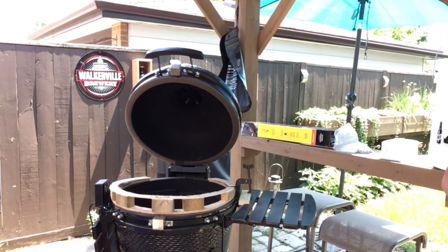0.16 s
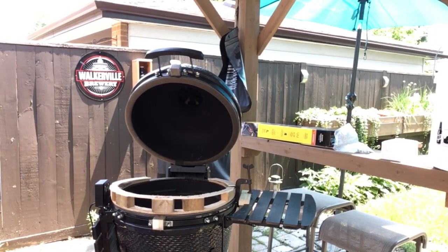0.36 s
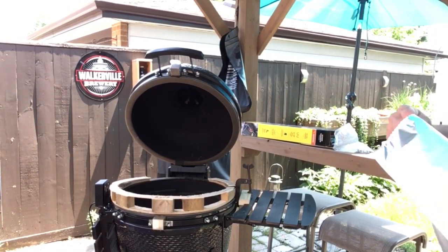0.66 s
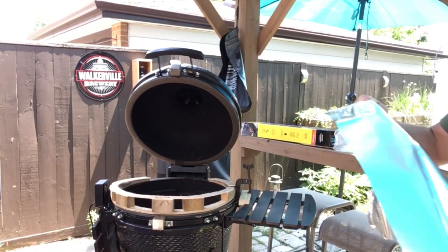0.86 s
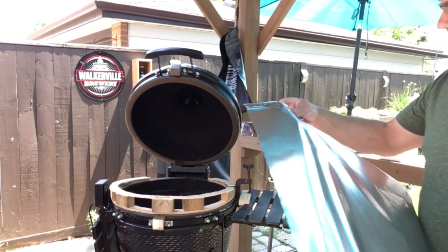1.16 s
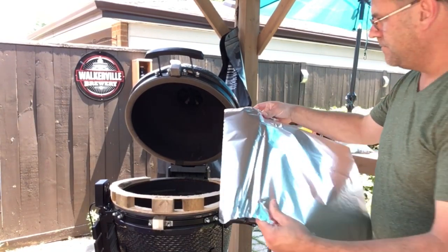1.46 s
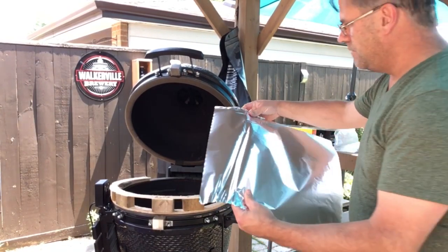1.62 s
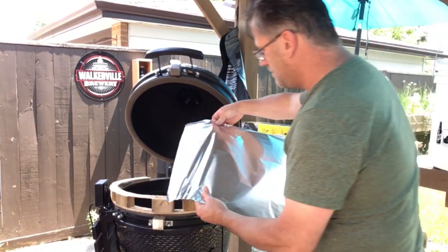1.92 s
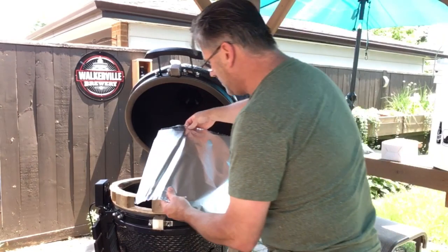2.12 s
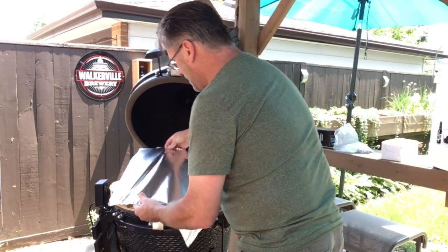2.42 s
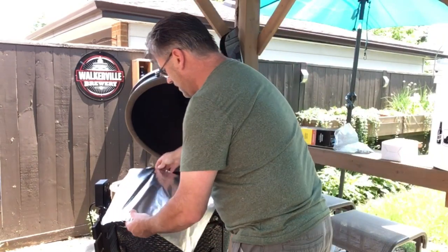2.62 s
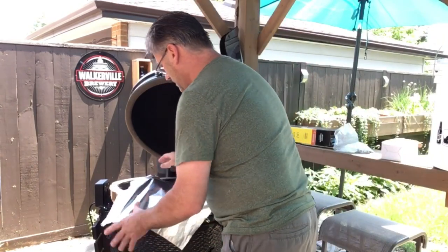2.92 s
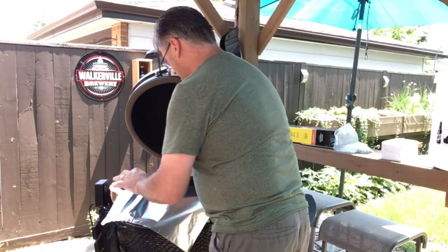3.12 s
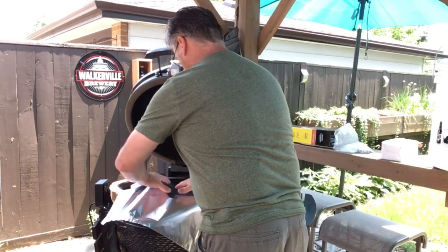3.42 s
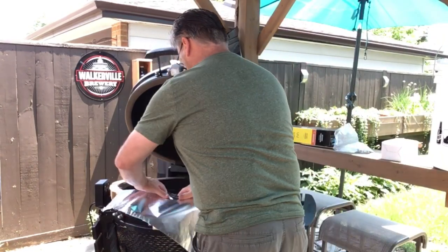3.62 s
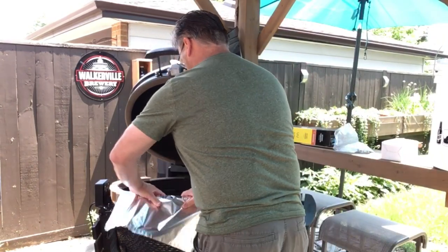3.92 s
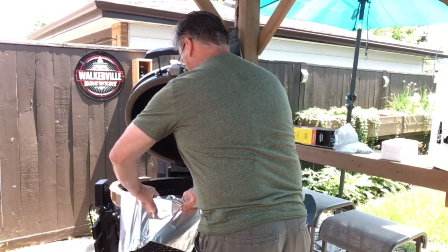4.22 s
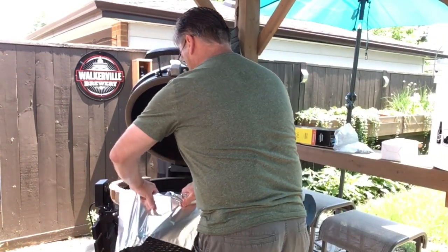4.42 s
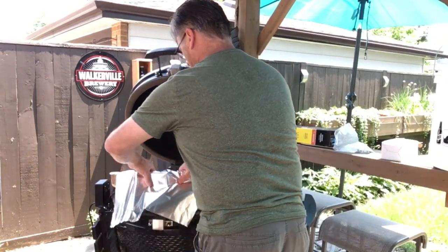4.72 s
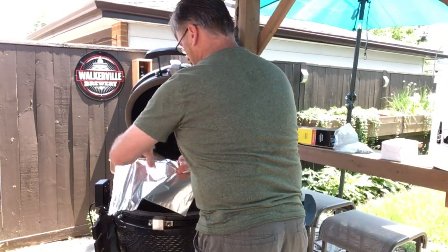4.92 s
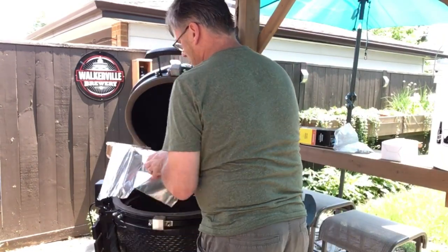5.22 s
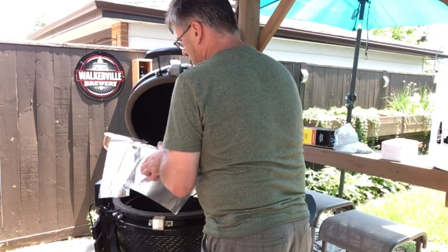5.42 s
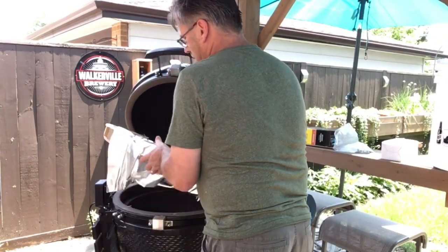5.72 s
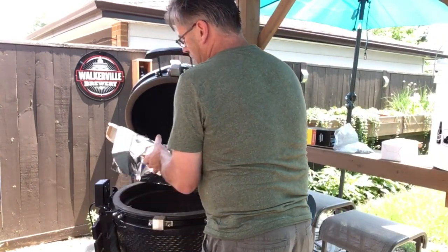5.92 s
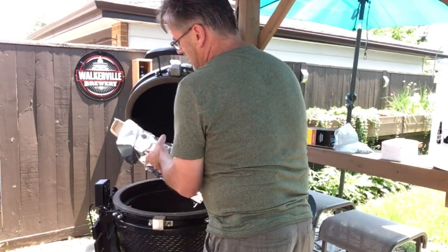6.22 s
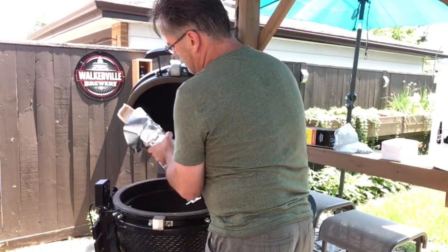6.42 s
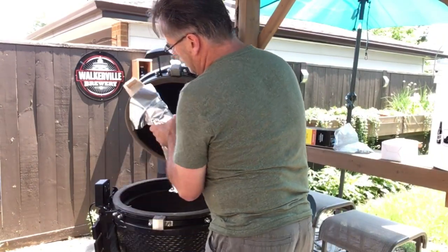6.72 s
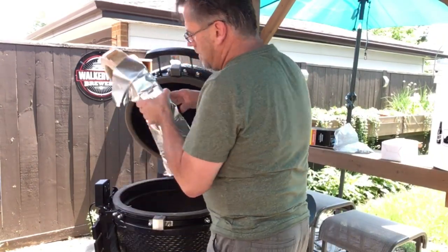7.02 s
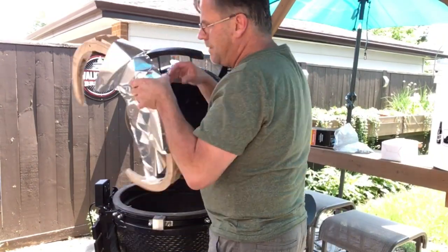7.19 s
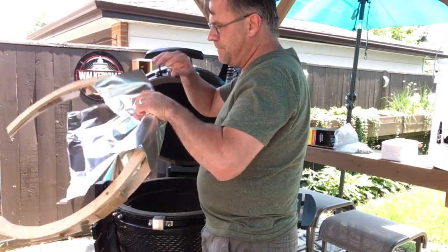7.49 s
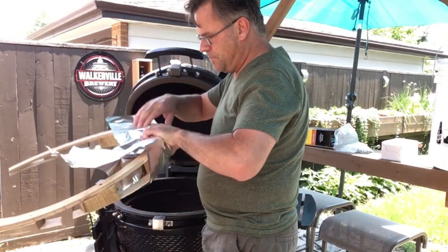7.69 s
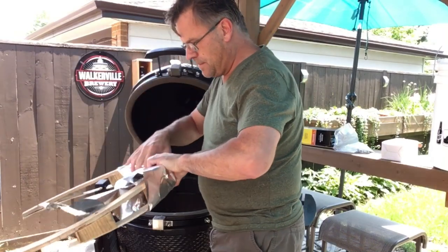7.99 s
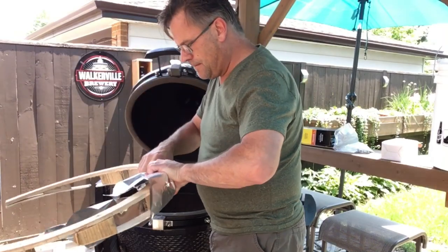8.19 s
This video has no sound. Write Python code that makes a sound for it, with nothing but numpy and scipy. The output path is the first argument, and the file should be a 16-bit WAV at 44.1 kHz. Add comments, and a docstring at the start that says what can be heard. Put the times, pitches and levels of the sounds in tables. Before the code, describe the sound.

A sheet of aluminium foil is torn off with a loud, bright rip while the roll knocks hollowly inside its cardboard box. The loose sheet then rustles and crinkles in uneven waves as it is carried and folded around a piece of wood, with sharp snaps, small pops and hollow finger crunches. The crinkling grows lighter later on. It is heard from nearby in a yard, over a faint low rumble.

```python
"""In a fenced back yard, a sheet of aluminium foil is torn off against the edge of its cardboard box,
carried to a grill and folded round a curved piece of wood. The box booms as the roll knocks inside it.
Countless tiny creases buckle and set the thin sheet ringing; now and then a whole fold snaps, a panel
pops or a pocket crunches under a finger. A low outdoor rumble lies underneath."""
import sys
import numpy as np
from scipy import signal
from scipy.fft import rfft, irfft, next_fast_len
from scipy.io import wavfile

SR = 44100
rng = np.random.default_rng(int(sys.argv[2]) if len(sys.argv) > 2 else 0)


def store_pcm(level_fs):
    """Save levels as 16-bit WAV."""
    pcm = np.round(np.clip(level_fs, -1, 1) * 32767).astype(np.int16)
    wavfile.write(sys.argv[1], SR, np.atleast_2d(pcm).T)


N = 368214


def from_db(db):
    """Turn decibels into a factor to multiply by."""
    return 10 ** (np.asarray(db) / 20)


def rms_one(x):
    """Scale a sound so that its average strength (rms) is 1."""
    return x / np.sqrt(np.mean(x ** 2) + 1e-20)


def coloured(x, spectrum):
    """Shape the tone of x with a smooth curve of (f/Hz, level/dB) points; rms 1."""
    hz, db = np.transpose(spectrum)
    size = next_fast_len(N + 8192)
    bin_hz = np.maximum(np.arange(size // 2 + 1) * SR / size, 1)
    gain = from_db(np.interp(np.log(bin_hz), np.log(hz), db))
    return rms_one(irfft(rfft(x, size) * gain, size)[:N])


def below(x, hz):
    """The part of x lower than hz."""
    return signal.sosfiltfilt(signal.butter(2, hz, fs=SR, output="sos"), x)


def treble(x, hz, db):
    """Turn the part of x above hz up or down by db."""
    under = below(x, hz)
    return under + from_db(db) * (x - under)


def drift(per_s):
    """A curve that wanders to a new random value per_s times a second; rms 1."""
    steps = np.arange(N) / SR * per_s
    return rms_one(np.interp(steps, np.arange(4000), rng.standard_normal(4000)))


def resonance(x, hz, width_hz):
    """Let x ring at one pitch; the narrower the width, the longer it rings."""
    r = np.exp(-np.pi * width_hz / SR)
    feedback = [1, -2 * r * np.cos(2 * np.pi * hz / SR), r * r]
    return signal.lfilter(np.array([1, 0, -1]) * (1 - r * r) / 2, feedback, x)


def ringing(push, tones):
    """A body rings at its own tones; each click lands elsewhere, so it pushes or pulls each at random."""
    return sum(from_db(db) * resonance(push * rng.choice([-1, 1], N), hz, width)
               for hz, width, db in tones)


def bursts(events, t60):
    """Loudness that jumps up at each (t/s, level/dB); t60 is always the seconds taken to fade by 60 dB."""
    out = np.zeros(N)
    for start, db in events:
        at = int(start * SR)
        age = np.arange(min(SR // 2, N - at)) / SR
        out[at:at + len(age)] += from_db(db - 60 * age / t60)
    return out


def stroke(start, length, attack_s, t60):
    """Loudness of one hand move: it rises, holds to the end of its length and dies away."""
    out = np.zeros(N)
    at = np.arange(int(start * SR), min(int(start * SR) + SR, N))
    age = at / SR - start
    out[at] = np.clip(age / attack_s, 0, 1) * from_db(-60 * np.maximum(age - length, 0) / t60)
    return out


def creases(per_s, spread_db, clump_db):
    """Foil buckles in clicks of uneven size that come in little clumps; rms 1."""
    chance = np.clip(per_s / SR, 1e-4, 1)
    sizes = from_db(spread_db * np.minimum(rng.exponential(1, N), 3)) * rng.choice([-1, 1], N)
    clicks = (rng.random(N) < chance) * sizes / np.sqrt(chance)
    return rms_one(clicks * from_db(clump_db * drift(140)))


def sheet(clicks, t60, ring_db):
    """After each click the crumpled sheet rings at so many pitches that it sounds like fading noise."""
    decay = from_db(-120 / (t60 * SR))
    energy = signal.lfilter([1 - decay], [1, -decay], clicks ** 2 + 1e-18)
    return rms_one(clicks + from_db(ring_db) * np.sqrt(energy) * rng.standard_normal(N))


# Tone of the outdoor rumble: f/Hz, relative level/dB
RUMBLE_COLOUR = [(22, -44), (40, -12), (62, 3.5), (88, -2), (118, 3.5), (180, -6), (235, -7.5), (320, -12),
                 (480, -19), (900, -21.5), (3500, -30), (9000, -52), (16000, -55.5)]
# Pitches of a faint, far-off hum: f/Hz, width/Hz, level/dB
HUM_TONES = [(77, 6, -52.5), (118, 9.7, -54), (230.7, 8.4, -57), (287.8, 14, -66)]

def background(rumble_db=-45.5, waver_db=0.2):
    """A distant rumble with a faint hiss and an unsteady hum."""
    rumble = from_db(rumble_db + waver_db * drift(11)) * coloured(rng.standard_normal(N), RUMBLE_COLOUR)
    noise = rng.standard_normal(N)
    hum = sum(from_db(db) * rms_one(resonance(resonance(noise, hz, width), hz, width))
              for hz, width, db in HUM_TONES)
    return rumble + hum


# Echoes from deck, fence and house: delay/s, level/dB compared with the direct sound
YARD_ECHOES = [(.0043, -37), (0.01, -24), (0.022, -23)]

def yard_echoes(x, tail_db=-21.5, t60=0.23, dull_hz=5000):
    """Hard surfaces throw the sound back; boards and leaves scatter it into a short, duller tail."""
    t = np.arange(SR // 2) / SR
    scatter = below(rng.standard_normal(len(t)), dull_hz) * from_db(-60 * t / t60) * (t > 0.008)
    response = from_db(tail_db) * scatter / np.linalg.norm(scatter)
    response[0] = 1   # the direct sound
    for delay, db in YARD_ECHOES:
        response[int(delay * SR)] += from_db(db)
    return signal.oaconvolve(x, response / np.linalg.norm(response))[:N]


# Tones of the cardboard box: f/Hz, width/Hz, relative level/dB
BOX_TONES = [(134, 34.5, -0.5), (226, 50, 0.5), (284, 20, 1.5), (412, 41, -3), (500, 300, -6.5),
             (732, 81, -6), (795, 350, -9)]
# Knocks of the roll: t/s, relative level/dB
ROLL_KNOCKS = [(0.169, -15), (0.203, -14.5), (0.376, -11), (0.45, -9), (0.477, -1.5)]

def knocking_roll(gain_db=35.0):
    """The roll jerks and knocks against the inside of its hollow box."""
    knocks = np.zeros(N) + 1e-18
    for start, db in ROLL_KNOCKS:
        knocks[int(start * SR)] = from_db(db + gain_db)
    return ringing(knocks, BOX_TONES)


# Tone of the rip: f/Hz, relative level/dB
TEAR_COLOUR = [(500, -17), (1000, -5), (1400, 3), (3000, 5), (5500, 4.5), (9000, 5.5), (12500, 6),
               (14500, 4.5), (16000, -6)]
# Tugs on the sheet: t/s, length/s, rise/s, rip level/dB, weakening/(dB per s), relative box level/dB
TEAR_TUGS = [(0.164, 0.028, 0.012, -15.5, 0, -30), (0.208, 0.098, 0.016, -5.5, 80, -17.5),
             (0.301, 0.17, 0.067, -7.5, 10.5, -14.5)]

def tearing(box_db=-1.5, box_follows=1.67, box_lag_s=0.0077):
    """With each tug the foil gives way tooth by tooth along the cutter, which shakes the box."""
    t = np.arange(N) / SR
    rip = shake = 0
    for start, length, attack_s, db, sag, shake_db in TEAR_TUGS:
        weakening = from_db(-sag * np.clip(t - start - attack_s, 0, length))
        pull = stroke(start, length, attack_s, t60=0.16) * weakening
        rip = np.hypot(rip, from_db(db) * pull)
        late_pull = np.interp(t - box_lag_s, t, pull)
        shake = np.hypot(shake, from_db(shake_db) * late_pull ** box_follows)
    teeth = creases(per_s=5000, spread_db=1.5, clump_db=-1.1)
    foil = coloured(sheet(teeth, t60=0.1, ring_db=0.5), TEAR_COLOUR)
    boom = ringing(teeth, BOX_TONES)
    return rip * foil + from_db(box_db) * shake * rms_one(boom - below(boom, hz=100))


# Tones of a hollow pocket of foil: f/Hz, width/Hz, relative level/dB
POCKET_TONES = [(176, 45, 2), (365, 72, -1.5), (624, 70, 5), (736, 83, 2), (1300, 270, -8),
                (1750, 370, -13)]
# Finger presses: t/s, relative level/dB
FINGER_PRESSES = [(3.949, -33), (4.009, -32), (4.185, -20), (5.324, -25), (5.444, -24.5), (5.55, -22),
                  (5.729, -27), (5.889, -38), (6.004, -37), (6.239, -27), (6.939, -27.5), (7.252, -29.5),
                  (8.151, -27)]

def pressing(gain_db=-12.0):
    """A finger flattens a pocket of foil against the wood with a short, hollow crunch."""
    push = bursts(FINGER_PRESSES, t60=0.15) * creases(per_s=5000, spread_db=-0.5, clump_db=2.5)
    return from_db(gain_db) * np.std(push) * rms_one(ringing(push, POCKET_TONES))


# Tones of a wide panel of foil: f/Hz, width/Hz, relative level/dB
PANEL_TONES = [(1250, 200, -1.5), (1790, 300, 1), (2720, 400, -1.5)]
# Pops of a panel: t/s, level/dB
PANEL_POPS = [(4.33, -39.5), (5.424, -38), (5.802, -37), (6.005, -28), (8.157, -31)]

def popping():
    """A bulging panel flips over to its other side and rattles."""
    rattle = ringing(creases(per_s=4000, spread_db=3.0, clump_db=2.0), PANEL_TONES)
    return bursts(PANEL_POPS, t60=0.17) * rms_one(rattle)


# Tone of a snap: f/Hz, relative level/dB
SNAP_TONE = [(150, -5), (700, -9), (1400, -1.5), (3000, 4.5), (6600, 4), (12500, 4), (16000, -1.5)]
# Sharp snaps and brief scrunches of foil: t/s, relative level/dB, extra sizzle/dB in the high treble
FOIL_SNAPS = [(0.036, -40, -1), (0.127, -43, 3), (0.964, -35, 1), (1.121, -20.5, 3), (1.363, -23, 3),
              (1.49, -40, -8), (2.037, -31, -8), (2.405, -35, -4), (2.574, -34, 0.5), (2.901, -39, -1),
              (3.487, -39, -8), (3.527, -28, 5), (3.619, -31.5, 0), (3.782, -26.5, 1), (4.183, -30, 4),
              (4.33, -30, -1), (4.505, -38, 4), (4.685, -31.5, -1.5), (4.925, -45, -1), (5.18, -46, -10.5),
              (5.29, -43, -8), (5.325, -29, 2), (5.422, -27, -1), (5.8, -27.5, -4), (6.002, -22.5, -9),
              (6.14, -37, 7), (6.524, -39, -5), (6.675, -45, 2), (6.773, -42, -4), (6.886, -41, -2),
              (7.237, -45, -1), (7.376, -39, -5), (7.534, -42, -7), (7.763, -35.5, -3), (7.916, -42, 7),
              (8.043, -34, 7), (8.155, -31.5, -2)]

def snapping(gain_db=-2.0, crack_db=-15.0):
    """A fold gives way or the foil is briefly scrunched: a crack, then a sizzling volley of creases."""
    clicks = creases(per_s=5800, spread_db=5.0, clump_db=-0.5)
    volley = coloured(sheet(clicks, t60=0.05, ring_db=4.0), SNAP_TONE)
    lower = below(volley, hz=7500)
    snaps = [(start, db) for start, db, _ in FOIL_SNAPS]
    sizzles = [(start, db + extra_db) for start, db, extra_db in FOIL_SNAPS]
    crack = from_db(crack_db) * bursts(snaps, t60=0.025) * volley
    body = bursts(snaps, t60=0.237) * rms_one(lower)
    sizzle = bursts(sizzles, t60=0.27) * rms_one(volley - lower)
    return from_db(gain_db) * (crack + body + sizzle)


def hush_before_snaps(hush_db=-1.0, hold_s=0.016):
    """The crinkling dips slightly just before each snap, so the snap sounds sharper."""
    dip_db = np.zeros(N)
    for start, _, _ in FOIL_SNAPS:
        at = int(start * SR)
        time_left = np.arange(min(at, SR // 4))[::-1] / SR
        dip_db[at - len(time_left):at] += hush_db * np.exp(-time_left / hold_s)
    return from_db(dip_db)


def pings(per_s, t60, count=10000):
    """Small flat spots of the sheet ring briefly, each at a pitch of its own; rms 1."""
    chance, pitch, phase = rng.random((3, count))
    starts = np.cumsum(-np.log(1 - chance)) / per_s * SR   # random gaps between pings
    heard = starts < N
    age = np.arange(SR // 25)
    hz = 300 + 15000 * pitch[heard, None]
    rings = np.sin(2 * np.pi * (hz * age / SR + phase[heard, None])) * from_db(-60 * age / SR / t60)
    at = starts[heard, None].astype(int) + age
    return rms_one(np.bincount(at.ravel(), rings.ravel(), N)[:N])


# Slow bends of the whole sheet: peak t/s, relative level/dB, swell/s, fade/s, extra sizzle/dB
# Swell and fade each cover 20 dB; when both are negative they swap roles.
SHEET_BENDS = [(0.04, -34.5, 4.5, 0.7, -3.5), (0.52, -27.5, 0.17, 0.36, -1), (0.68, -27, 0.5, 1.17, -4.5),
               (1.16, -24, 0.35, 0.69, -4), (1.969, -34.5, 0.9, 0.81, -5.5), (2.741, -26, 0.6, 0.2333, -3),
               (3.05, -56.5, -1.05, -0.5, -8), (4.0, -27.5, 0.1546, 0.83, 0), (4.79, -38, 1.0, 0.3, -0.5),
               (5.761, -29.5, 0.27, 0.4, -1), (5.979, -29.6, 0.3, 0.94, 0), (7.1, -41.5, 0.2, 0.25, 4),
               (7.8, -42, 0.85, 1.1, -3), (8.27, -36, 0.83, 2, -4)]
# A hand crushes a patch of foil: t/s, length/s, relative level/dB, extra sizzle/dB
HAND_SCRUNCHES = [(0.945, 0.063, -28.5, -4.5), (1.011, 0.06, -24.5, -0.5), (1.179, 0.055, -24, -0.4),
                  (1.284, 0.028, -27.1, -0.2), (1.481, 0.05, -31.5, -5.5), (1.563, 0.084, -29.5, -5),
                  (2.015, 0.022, -28.5, -4), (2.432, 0.091, -32, -1.3), (2.559, 0.021, -34.5, 4),
                  (2.713, 0.022, -37.5, 9), (2.872, 0.036, -32.5, -4.5), (3.496, 0.09, -27.5, -2.5),
                  (3.593, 0.052, -30, 0), (3.681, 0.07, -27.5, 0.2), (3.814, 0.13, -28.5, 0.7),
                  (4.491, 0.017, -36, -0.5), (4.542, 0.13, -35, 0.6), (4.763, 0.027, -43, 6),
                  (5.026, 0.047, -48, -4.8), (5.306, 0.024, -27.5, -3.5), (5.37, 0.067, -31, -0.5),
                  (5.46, 0.11, -30.5, 1.504), (5.781, 0.055, -32, 1), (5.974, 0.07, -37, 3.5),
                  (6.219, 0.05, -35.5, 1), (6.378, 0.073, -35.5, -9), (6.51, 0.1, -40, -3),
                  (6.752, 0.015, -41, -8), (6.872, 0.099, -34.5, -1.5), (7.031, 0.086, -42, 0),
                  (7.226, 0.036, -39, -3), (7.396, 0.043, -41.5, -6.5), (7.522, 0.079, -38.8, -5),
                  (7.591, 0.058, -38, -1), (7.768, 0.041, -38, -1.2), (7.903, 0.017, -41, 4),
                  (8.012, 0.1, -33, -0.4), (8.126, 0.053, -32, -5), (8.265, 0.08, -32.5, -2.5)]

def handling(busy_db, held_db=-68.5, held_sizzle_db=-5, brightening=0.51):
    """Crinkle and sizzle levels (dB) as the hands work; a sheet that is only held still creases faintly."""
    t = np.arange(N) / SR
    crinkle = sizzle = 1e-12
    for peak, db, swell_s, fade_s, sizzle_db in SHEET_BENDS:
        away = np.minimum(np.maximum((peak - t) / swell_s, (t - peak) / fade_s), 10)
        power = from_db(db - 20 * away) ** 2
        crinkle += power
        sizzle += power * from_db(sizzle_db) ** 2
    sizzle *= (crinkle / from_db(busy_db) ** 2) ** brightening   # harder bends sound brighter
    sizzle += from_db(held_db + held_sizzle_db) ** 2
    crinkle += from_db(held_db) ** 2
    for start, length, db, sizzle_db in HAND_SCRUNCHES:
        crinkle += (from_db(db) * stroke(start, length, attack_s=0.026, t60=0.3)) ** 2
        # The finest creases start sooner and die faster.
        sizzle += (from_db(db + sizzle_db) * stroke(start, length, attack_s=0.023, t60=0.28)) ** 2
    return 10 * np.log10(crinkle), 10 * np.log10(sizzle)


# Tone of the ringing sheet: f/Hz, relative level/dB
SHEET_COLOUR = [(120, -18), (230, -5.5), (480, -9.5), (700, -4.5), (920, -8), (1300, -1), (2100, -0.5),
                (2900, 3), (5000, 1), (6600, 0.5), (10300, -4), (12300, -3.5), (14500, -7.5),
                (16000, -19.5)]
# Low flexing, weak while the sheet hangs free, strong on the wood: t/s, level/dB added to the crinkle
PANEL_FLEX = [(0.1, -10.5), (0.7, -16.5), (1.25, -27), (2.0, -23.5), (2.65, -22), (3.6, -17), (4.0, -10.5),
              (4.45, -9.5), (4.8, -14), (5.6, -11.5), (7.7, -15.5), (8.2, -10)]

def crinkling(middle_db=-0.8, top_db=0.1, ping_db=-8.0, busy_per_s=2800, busy_db=-30.5):
    """Harder handling makes more, louder and brighter creases; wide panels flex low, tight folds sizzle."""
    level_db, sizzle_db = handling(busy_db)
    flex_db = np.interp(np.arange(N) / SR, *np.transpose(PANEL_FLEX))
    per_s = busy_per_s * from_db(0.45 * (level_db - busy_db))
    clicks = creases(per_s, spread_db=2.5, clump_db=1.36)
    metal = sheet(clicks, t60=0.15, ring_db=5.5) + from_db(ping_db) * pings(per_s=650, t60=0.092)
    foil = coloured(metal, SHEET_COLOUR)
    low, under_top = below(foil, hz=1100), below(foil, hz=7500)
    dull_db = 0.25 * np.minimum(sizzle_db - level_db + 3.5, 0)
    bright_db = 0.12 * np.maximum(sizzle_db - busy_db + 3, -18)
    middle = treble(rms_one(under_top - low), hz=4200, db=dull_db)
    top = treble(rms_one(foil - under_top), hz=11500, db=bright_db)
    body = from_db(flex_db) * rms_one(low) + from_db(middle_db) * middle
    return hush_before_snaps() * (from_db(level_db) * body + from_db(sizzle_db + top_db) * top)


def scene():
    """Foil and box echo in the yard over the rumble, the same on the left and the right."""
    foil_and_box = tearing() + knocking_roll() + crinkling() + snapping() + pressing() + popping()
    mono = yard_echoes(foil_and_box) + background()
    return np.array([mono, mono])


def record(dry, ceiling=1.14, low_cut_hz=42, high_cut_hz=15750):
    """Round off the loudest peaks, then drop the deepest bass and the very highest treble."""
    rounded = ceiling * np.tanh(dry / ceiling)
    low_cut = signal.butter(4, low_cut_hz, "high", fs=SR, output="sos")
    high_cut = signal.ellip(12, 0.1, 90, high_cut_hz, fs=SR, output="sos")
    return signal.sosfilt(high_cut, signal.sosfilt(low_cut, rounded))


dry = scene()
out = record(dry)
store_pcm(out)
```